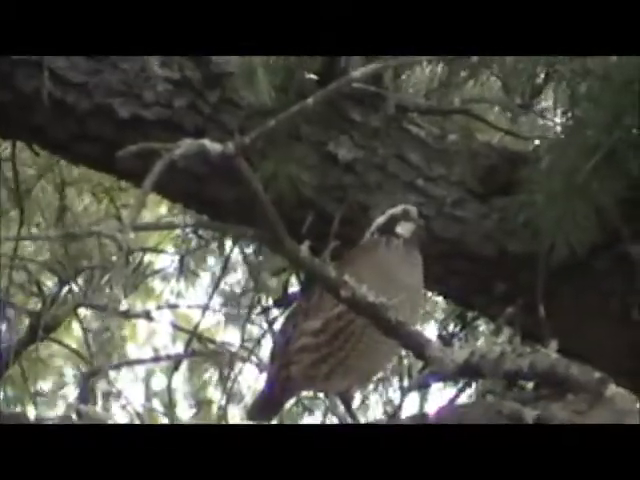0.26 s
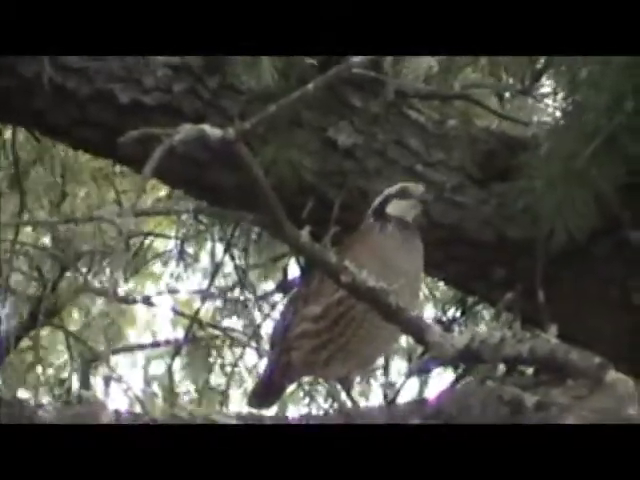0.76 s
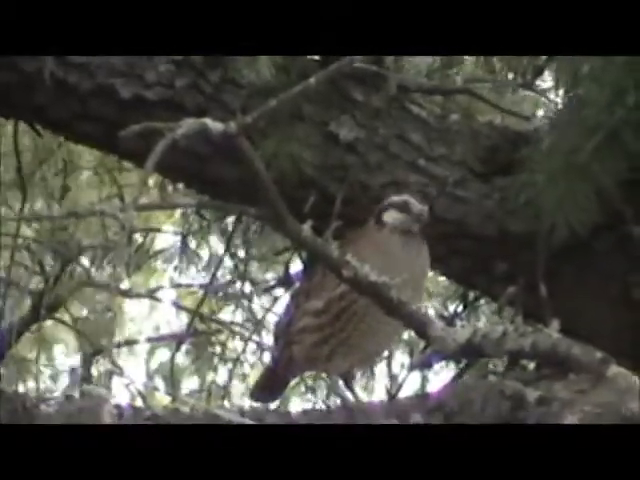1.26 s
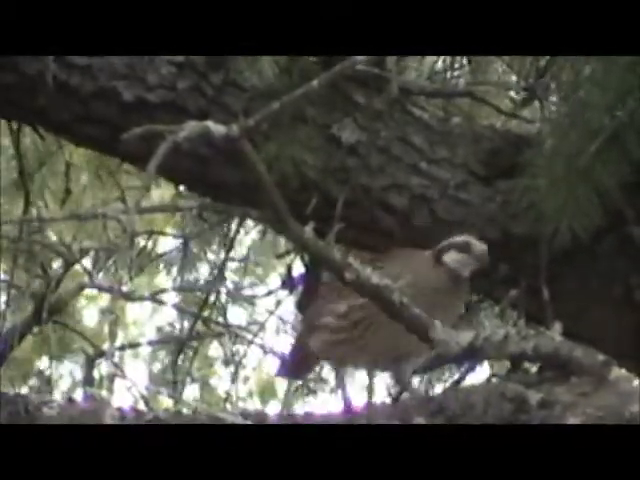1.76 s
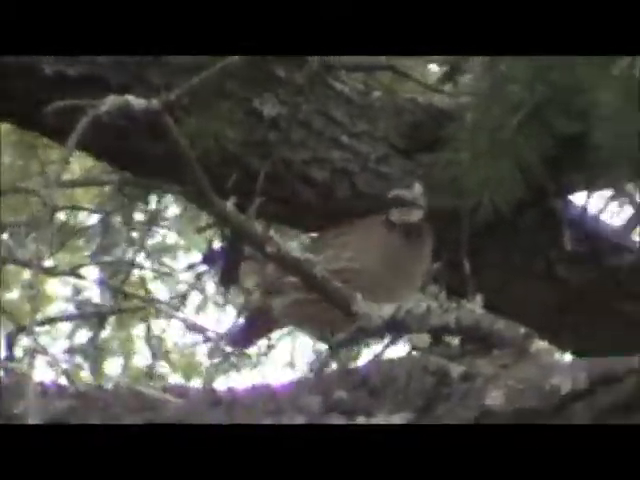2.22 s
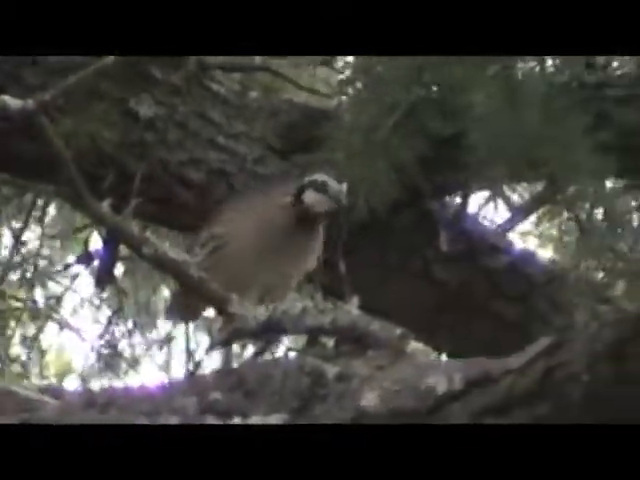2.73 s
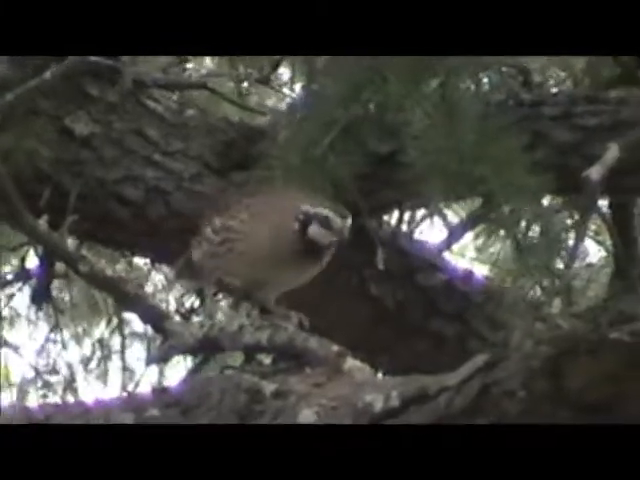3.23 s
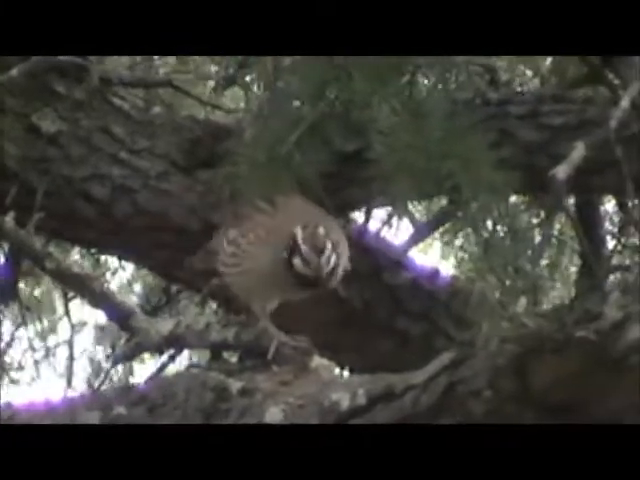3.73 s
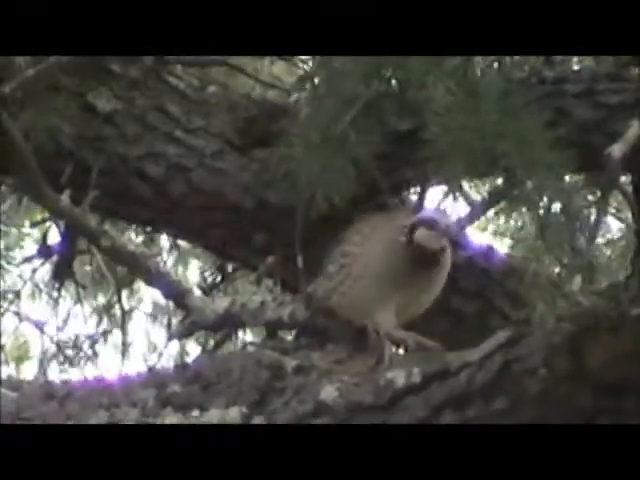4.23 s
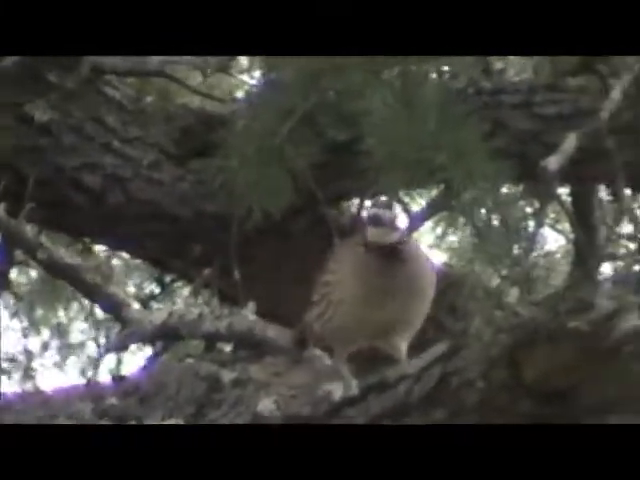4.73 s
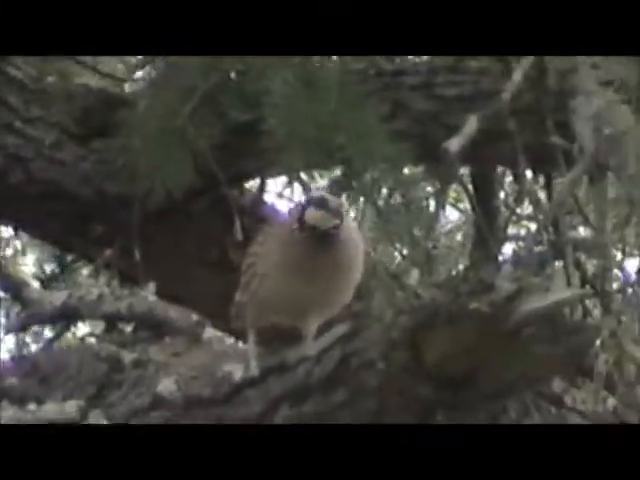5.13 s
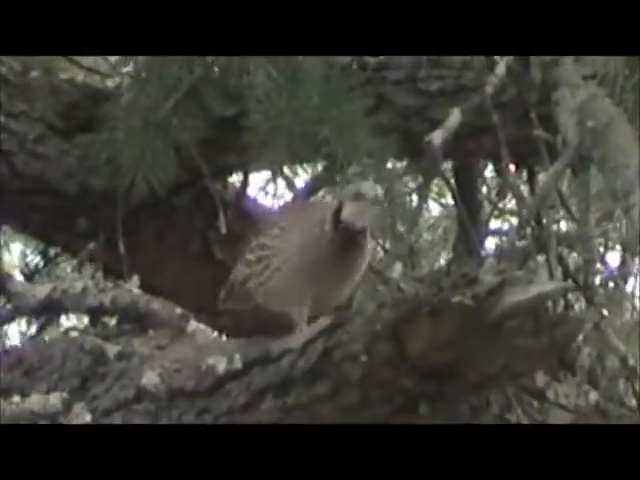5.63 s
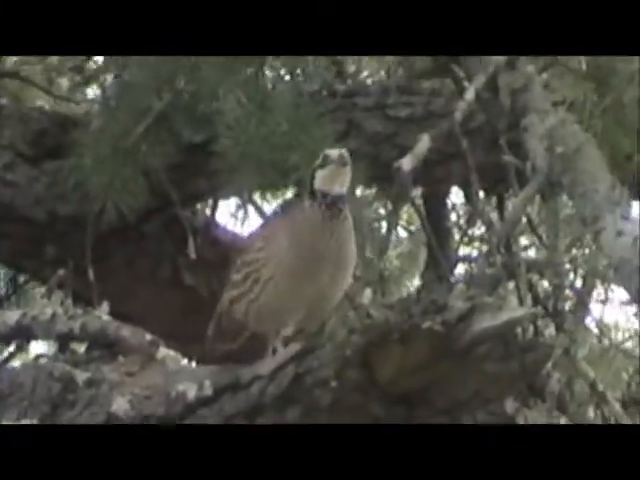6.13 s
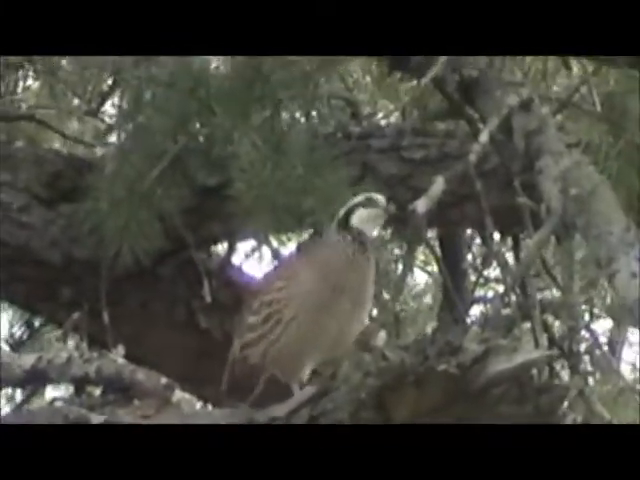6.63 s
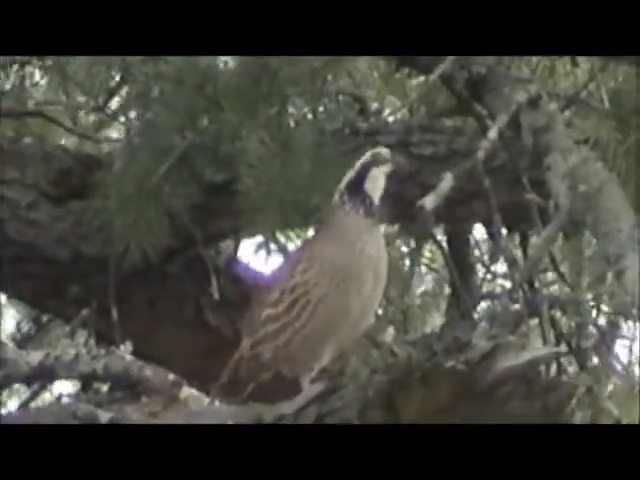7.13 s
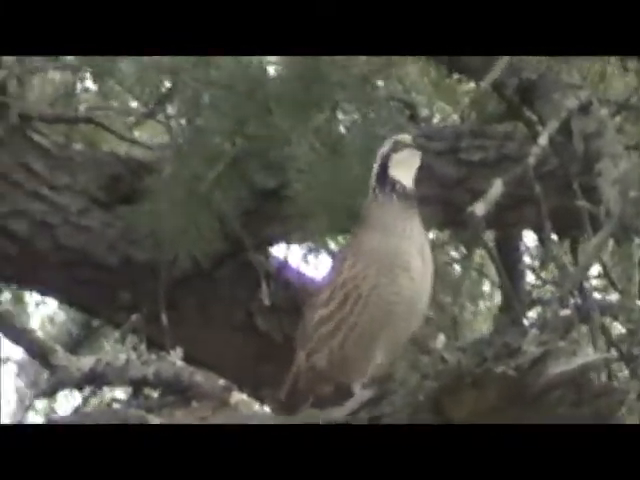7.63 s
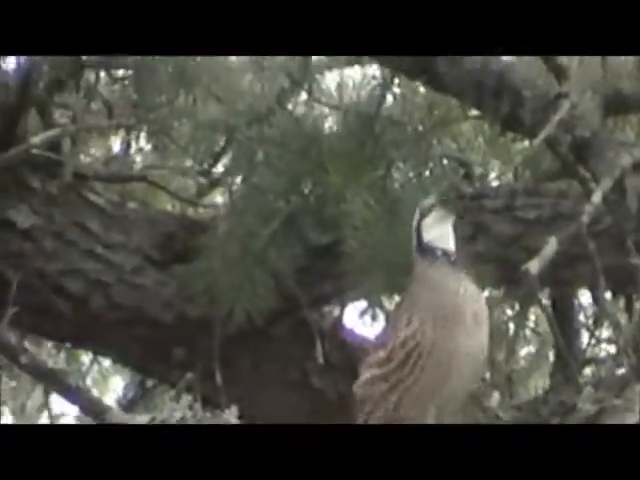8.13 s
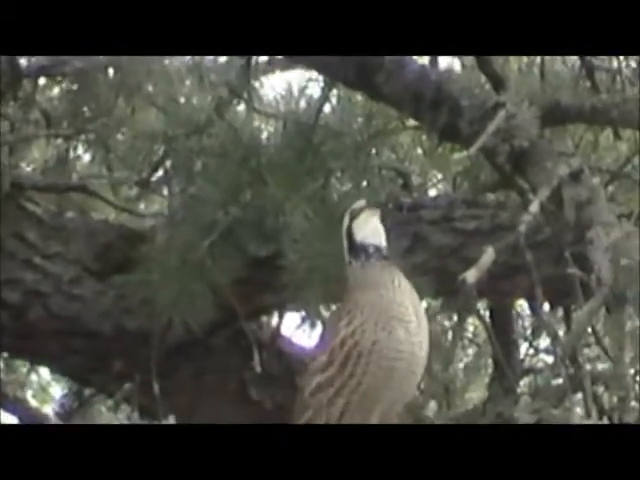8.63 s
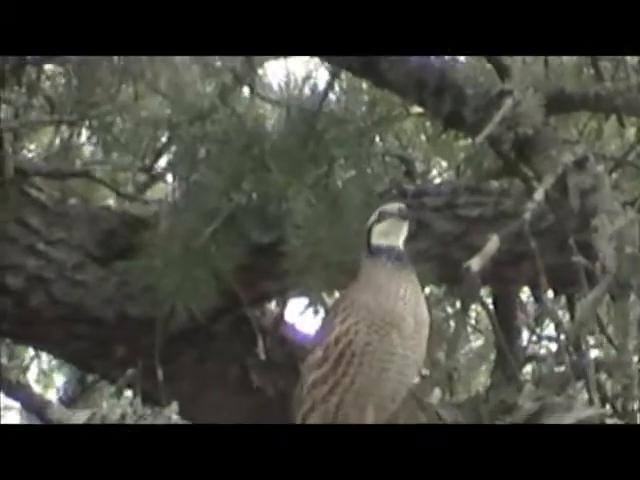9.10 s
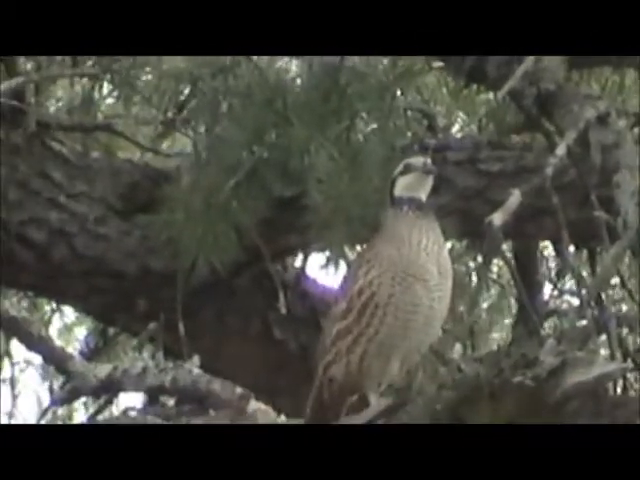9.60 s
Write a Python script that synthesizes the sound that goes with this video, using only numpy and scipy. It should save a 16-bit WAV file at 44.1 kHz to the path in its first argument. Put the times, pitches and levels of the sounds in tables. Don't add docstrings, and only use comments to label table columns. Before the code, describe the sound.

A wooded outdoor place with a continuous soft hiss and low rumble of far traffic, quietest at 0-1 s, swelling until about 5 s and then staying full. A heavy engine drones faintly, low at first, shifting higher around 4.2 s, strongest near 5.7 s, then settling and fading. Tiny chips, seeps and slurs are scattered throughout over a thin haze of distant birds. Clearer arched, very high pipes come from the right at about 3.1, 3.7, 5.4, 6.3, 7.4 and 9.35 s; a high sagging note at 5.2 s lies left. Faint twig rustles surface, mostly between 4 and 6.7 s, and needles hiss gently around 7.6 s. At 8.13 s a small low air puff bumps, mostly left. The quail whistles a level, clear note at 8.2 s, then at 8.85 s a louder note sweeping steeply upward, cracking at 9.0 s into a brief falling rasp. Light trunk echoes fade into traffic.

```python
import sys
import numpy as np
from scipy import signal
from scipy.fft import rfft, irfft
from scipy.io import wavfile
from scipy.ndimage import uniform_filter1d

SR = 44100
rng = np.random.default_rng(int(sys.argv[2]) if len(sys.argv) > 2 else 0)


def digitize_waveform(pressure):
    field = np.atleast_2d(pressure).T
    bounded = np.clip(field, -1, 1)
    quanta = np.round(bounded * 32767).astype(np.int16)
    wavfile.write(sys.argv[1], SR, quanta)


def volts_from_decibels(level):
    exponent = np.asarray(level, float) / 20
    return 10 ** exponent


N = 434826

# time in seconds, pitch in Hz, effort in dB.
WHISTLE_NOTES = [
    [(8.186, 1156, -34), (8.202, 1536, -31), (8.211, 1628, -18.5), (8.232, 1767, -16.5), (8.278, 1822, -18),
     (8.3, 1862, -15.5), (8.34, 1842, -17), (8.354, 1760, -30), (8.37, 1800, -34)],
    [(8.848, 896, -38), (8.87, 1338, -39), (8.885, 1643, -19.5), (8.9, 1785, -17.5), (8.956, 2023, -10.5),
     (8.975, 2213, -14.5), (8.992, 2535, -11), (9.001, 2660, -16)],
]
# multiple, level in dB.
WHISTLE_OVERTONES = [(1.25, -21.5), (1.75, -36), (2, -29), (3, -46), (3.5, -43), (3.75, -43), (4, -32.5),
                     (4.25, -41), (4.5, -46), (4.75, -42), (5, -39), (5.25, -48), (5.75, -49), (6, -51),
                     (6.5, -47), (6.75, -44), (7, -39)]
# frequency in Hz, gain in dB.
BRANCH_COMB = [(1650, 1.5), (1755, -9.5), (1830, 2.5), (1950, 2), (1985, -7), (2005, 3.5), (2080, -14),
               (2200, 4.5), (2290, 0), (2390, -13), (2470, -3), (2600, -0.5)]
# frequency in Hz, gain in dB.
BEAK_COLOUR = [(3000, -8.5), (7000, 8), (8500, -0.5), (10000, -2), (12500, -13), (14000, -19)]
# time in seconds, pulse rate in Hz, effort in dB.
RASP_CURVE = [(8.998, 1883, -25), (9.003, 1797, -21.5), (9.016, 1480, -23), (9.028, 1347, -21),
              (9.04, 1260, -30), (9.064, 1064, -28), (9.088, 884, -32), (9.1, 800, -46)]
# frequency in Hz, gain in dB.
THROAT_COLOUR = [(900, -32), (1600, -18), (2100, -8), (2550, -4.5), (3000, -7), (3250, -6), (3520, -2.5),
                 (3900, -15), (4300, -16.5), (4900, -14.5), (5600, -21), (7000, -28), (9000, -31),
                 (14000, -51)]

# start in seconds, length in seconds, top pitch in Hz, last pitch in Hz, level in dB.
PIPER_CALLS = [(1.495, 0.08, 7530, 6270, -56), (3.101, 0.15, 8090, 6600, -43),
               (3.692, 0.15, 8110, 6680, -42), (5.388, 0.11, 8120, 6440, -47),
               (5.87, 0.093, 7700, 7100, -49), (6.254, .118, 8020, 6500, -45),
               (7.371, 0.13, 8100, 7630, -45), (9.35, 0.11, 7900, 7600, -50.5)]
# start in seconds, first pitch in Hz, level in dB.
CHIP_CALLS = [(0.029, 4100, -51.5), (.92, 7600, -58), (2.67, 7400, -47), (2.72, 4050, -52),
              (3.409, 4800, -58), (3.741, 3500, -52), (4.26, 4450, -51), (7.175, 4100, -44.5)]
# start in seconds, length in seconds, first pitch in Hz, last pitch in Hz, level in dB.
SLUR_CALLS = [(0.068, .04, 6300, 6750, -60.5), (.69, .05, 6600, 7900, -66), (.78, .043, 7000, 8160, -67),
              (1.323, 0.074, 9600, 8050, -59), (1.69, 0.082, 10500, 5500, -52.5),
              (1.84, 0.056, 7700, 6840, -63), (2.06, .079, 7000, 6050, -59),
              (2.506, 0.12, 2970, 3140, -51.5), (3.347, 0.084, 4900, 6700, -57),
              (3.57, .04, 6250, 7500, -64), (8.57, 0.033, 7900, 8370, -53), (8.59, .026, 8400, 9800, -60.5)]
# start in seconds, length in seconds, pitch in Hz, level in dB.
SEEP_CALLS = [(.11, 0.16, 7300, -71), (.85, .1, 7410, -64), (1.1, .1, 7550, -70), (1.39, 0.071, 8240, -57),
              (2.02, .08, 7550, -71), (2.12, 0.39, 7700, -62), (2.127, .25, 7090, -61),
              (2.4, 0.44, 7500, -62), (2.46, 0.035, 2850, -50), (2.495, .1, 2780, -52),
              (2.777, 0.11, 5350, -51), (4.04, 0.045, 9130, -62), (4.547, .07, 7100, -57),
              (8.704, .05, 7830, -66)]
# start in seconds, length in seconds, first pitch in Hz, level in dB.
SAG_CALLS = [
    (2.426, 0.18, 8850, -51.5),
    (4.505, 0.11, 8600, -58.5),
    (5.194, 0.13, 8460, -45.5),
]
PIPER_LEAN_DB, CHIP_LEAN_DB, SLUR_LEAN_DB, SEEP_LEAN_DB, SAG_LEAN_DB = -3, -3, -5, -1, 7
CHIP_S, CHIP_DIP_SHARE, SAG_HZ_PER_S = 0.04, 0.09, 1200
CHORUS_DB, CHORUS_JOINS_S, CHORUS_SWELL_S, CHORUS_GROWS_DB_PER_S = -65.5, 0.69, 0.18, 0.63

# start in seconds, length in seconds, level in dB.
TWIG_RUSTLES = [(1.5, .13, -57), (2.68, .04, -61), (3.363, .13, -57), (3.974, .16, -56), (4.24, .18, -52.5),
                (5.46, .06, -60), (5.9, .08, -54), (6.29, .08, -52), (6.6, .1, -53), (7.751, 0.095, -58),
                (8.58, 0.046, -63), (9.756, .05, -67.5)]
# start in seconds, length in seconds, level in dB.
AIR_PUFFS = [
    (8.129, 0.028, -35),
    (8.14, .016, -26),
    (8.153, .03, -35.5),
    (8.177, 0.042, -43),
]

# frequency in Hz, density in dB per Hz.
WASH_COLOUR = [(18, -49), (30, -33.5), (130, 0), (369, -14.5), (575, -10.5), (690, -4.5), (1020, -5.5),
               (1260, -6), (1960, -9), (3670, -19.5), (6880, -23), (8930, -38), (12500, -46), (14300, -53),
               (15600, -64)]
# centre in Hz, width in Hz, height in dB.
HISS_HUMP_HZ_HZ_DB = (5020, 370, 2.8)
# time in seconds, level in dB.
TRAFFIC_SWELL = [(0, -52.5), (.35, -54), (1.5, -47), (2.2, -47), (2.8, -46), (3.1, -46), (3.85, -43),
                 (4.6, -43), (5.15, -40), (5.7, -41.5), (6.55, -42.5), (7.2, -42), (7.7, -41.5), (8.3, -41),
                 (8.8, -43.5), (9.86, -43)]
# centre in seconds, half length in seconds, rise in dB.
NEEDLE_GUSTS = [
    (1.55, 0.21, 1),
    (4.1, 0.16, 1),
    (5.2, 0.51, 0),
    (6.3, 0.86, 2),
    (7.63, 0.31, 3),
]
# frequency in Hz, correlation from 0 to 1.
PORT_LIKENESS = [(60, 0.64), (180, 1), (380, .76), (700, 0.93), (1650, 0.87), (5000, 1), (8000, 1),
                 (15000, 0.27)]
# frequency in Hz, left over right in dB.
PORT_LEAN = [(60, -6.5), (180, 6.5), (550, 0.5), (1650, -4), (4970, -0.5), (15000, -1.5)]
# frequency in Hz, phase in radians.
PORT_LEAD = [(60, 0.09), (500, -0.24), (2500, 0.18)]
FULL_S = 5.2
RUMBLE_SHARE, ROAR_SHARE, UPPER_SHARE, HISS_SHARE, FIZZ_SHARE = 0.38, 1.005, 1.33, 1, 1.1
LORRY_NEAREST_S, LORRY_PASS_S = 6.67, 3.4
GUST_REACH = 0.26
# time in seconds, firing rate in Hz, level in dB.
ENGINE_GEARS = [
    [(0, 84, -61), (1.5, 84.5, -53), (3.2, 82.8, -50.5), (4.0, 81.5, -62)],
    [(4.25, 131.5, -48), (4.6, 130.1, -49.5), (5.7, 126.5, -40.5), (6.4, 125.7, -43.5), (6.8, 122.5, -47)],
    [(7.15, 123.3, -51.5), (7.6, 123, -45), (8.4, 121.9, -50.5), (9.86, 124, -59.5)],
]

# frequency in Hz, t60 in seconds.
TREE_DECAY = [(500, 0.67), (2000, 0.51), (4000, 0.61), (8000, 0.3), (14000, 0.38)]
FAR_DB, FAR_STRETCH = -4, 2.6


def evened(x):
    return x / np.sqrt(np.mean(x ** 2) + 1e-20)


def read(points, hz):
    f, value = np.transpose(points)
    return np.interp(np.log(hz + 1), np.log(f + 1), value)


def add(mix, start_s, sound):
    part = mix[..., round(start_s * SR):][..., :sound.shape[-1]]
    part += sound[..., :part.shape[-1]]


def unfold(rows):
    s, *columns = np.transpose(rows)
    t = np.arange(s[0], s[-1], 1 / SR)
    return s[0], [uniform_filter1d(np.interp(t, s, c), size=130, mode="nearest") for c in columns]


def drift(count, size):
    return evened(uniform_filter1d(uniform_filter1d(rng.standard_normal(count), size), size))


def sine(hz):
    return np.sqrt(2) * np.sin(2 * np.pi * np.cumsum(hz) / SR)


def panned(x, lean_db):
    return np.array([x * volts_from_decibels(lean_db / 2), x * volts_from_decibels(-lean_db / 2)])


def quail_whistle(rows):
    start_s, (hz, effort_db) = unfold(rows)
    tone = volts_from_decibels(effort_db + read(BRANCH_COMB, hz)) * sine(hz)
    for k, db in WHISTLE_OVERTONES:
        effort_share = 0.6 if k % 1 == 0 else 1.3
        drive_db = effort_share * (effort_db + 13.5) - 15
        overtone_db = drive_db + db + read(BEAK_COLOUR, k * hz) + 3.2 * drift(len(hz), size=250)
        tone += volts_from_decibels(overtone_db) * sine(k * hz)
    return start_s, tone * signal.windows.tukey(len(hz), 0.08)


def quail_rasp():
    start_s, (hz, effort_db) = unfold(RASP_CURVE)
    count = len(hz)
    hz = hz * (1 + 0.0037 * drift(count, size=40))
    stack = np.zeros(count)
    for k in range(1, 14):
        gain = volts_from_decibels(read(THROAT_COLOUR, k * hz) + 2.5 * drift(count, size=150))
        stack += gain * sine(k * hz) * (k * hz < 15000)
    throat_gain = volts_from_decibels(read(THROAT_COLOUR, np.fft.rfftfreq(count, 1 / SR)))
    air = irfft(rfft(rng.standard_normal(count)) * throat_gain, count)
    air = volts_from_decibels(-2.0 - 90 * np.arange(count) / SR) * evened(air)
    return start_s, volts_from_decibels(effort_db) * (stack + air) * signal.windows.tukey(count, 0.08)


def quail():
    out = np.zeros(N)
    for rows in WHISTLE_NOTES:
        add(out, *quail_whistle(rows))
    add(out, *quail_rasp())
    return panned(out, -3.5)


def piper():
    out = np.zeros((2, N))
    for start_s, length_s, top_hz, last_hz, db in PIPER_CALLS:
        u = np.linspace(0, 1, round(length_s * SR))
        hz = top_hz * (1 - 0.036 * (1 - u) ** 5.25) - (top_hz - last_hz) * u ** 5.0
        tone = sine(hz) + volts_from_decibels(-25) * u ** 3.0 * sine(2 * hz)
        tone *= volts_from_decibels(db + 4.2 * u + 3.2 * drift(len(u), size=120))
        left, right = panned(tone * signal.windows.tukey(len(u), 0.3), PIPER_LEAN_DB)
        add(out, start_s, np.array([np.roll(left, 1), right]))
    return out


def chirp(start_s, length_s, first_hz, last_hz, db, lean_db, flutter_db=4.0):
    u = np.linspace(0, 1, round(length_s * SR))
    hz = last_hz + (first_hz - last_hz) * (1 - u) ** 2.6
    hz = hz * (1 + 0.008 * drift(len(u), size=100))
    level = volts_from_decibels(db + 4.4 * (u - 1.0) + flutter_db * drift(len(u), size=120))
    return start_s, panned(level * sine(hz) * signal.windows.tukey(len(u), 0.6), lean_db)


def small_birds():
    out = np.zeros((2, N))
    for start_s, hz, db in CHIP_CALLS:
        last_hz = hz * (1 - CHIP_DIP_SHARE)
        add(out, *chirp(start_s, CHIP_S, hz, last_hz, db, CHIP_LEAN_DB, flutter_db=5.5))
    for row in SLUR_CALLS:
        add(out, *chirp(*row, SLUR_LEAN_DB))
    for start_s, length_s, hz, db in SEEP_CALLS:
        add(out, *chirp(start_s, length_s, hz, hz, db, SEEP_LEAN_DB))
    for start_s, length_s, hz, db in SAG_CALLS:
        add(out, *chirp(start_s, length_s, hz, hz - SAG_HZ_PER_S * length_s, db, SAG_LEAN_DB))
    return out


def rustles():
    out = np.zeros((2, N))
    bright = signal.butter(2, [3500, 8500], "bandpass", fs=SR, output="sos")
    for start_s, length_s, db in TWIG_RUSTLES:
        count = round(length_s * SR)
        snaps = rng.standard_normal((3, count)) * volts_from_decibels(3.1 * rng.exponential(1, count))
        ports = snaps[0] + 0.68 * snaps[1:]
        add(out, start_s, volts_from_decibels(db) * evened(signal.sosfilt(bright, ports)) * np.hanning(count) ** 0.42)
    return out


def puffs():
    out = np.zeros((2, N))
    low = signal.butter(2, [70, 520], "bandpass", fs=SR, output="sos")
    for start_s, length_s, db in AIR_PUFFS:
        lump = signal.sosfilt(low, rng.standard_normal((2, 4000)))[:, -round(length_s * SR):]
        port_db = db + np.array([[2.5], [-2.5]])
        add(out, start_s, volts_from_decibels(port_db) * evened(lump) * np.hanning(lump.shape[1]))
    return out


def swell(t):
    s, db = np.transpose(TRAFFIC_SWELL)
    return np.interp(t, s, db) - np.interp(FULL_S, s, db)


def road():
    frames, hz = N // 256 + 5, np.fft.rfftfreq(1024, 1 / SR)
    a, b, c, d, patches = rng.standard_normal((frames, 513, 5)).T
    patches = evened(uniform_filter1d(uniform_filter1d(patches, size=8, axis=0), size=50, axis=1))
    t = np.arange(frames) * 256 / SR
    layers_db = np.outer([RUMBLE_SHARE, ROAR_SHARE, UPPER_SHARE, HISS_SHARE, FIZZ_SHARE], swell(t))
    layers_db[0] -= 10 * np.log10(1 + ((t - LORRY_NEAREST_S) / LORRY_PASS_S) ** 2)
    gust_db = sum(db * np.exp(-((t - s) / half_s) ** 2) for s, half_s, db in NEEDLE_GUSTS)
    layers_db[2:] += np.outer([1, GUST_REACH, GUST_REACH], gust_db)
    centres = np.log([200, 900, 2300, 5000, 10000])
    shares = np.array([np.interp(np.log(hz + 1), centres, row) for row in np.eye(5)])
    hump_hz, hump_width_hz, hump_db = HISS_HUMP_HZ_HZ_DB
    colour_db = read(WASH_COLOUR, hz) + hump_db * np.exp(-((hz - hump_hz) / hump_width_hz) ** 2)

    same = np.clip(read(PORT_LIKENESS, hz), -1, 1)[:, None]
    left = a + 1j * b
    right = same * left + np.sqrt(1 - same ** 2) * (c + 1j * d)
    right = right * np.exp(-1j * read(PORT_LEAD, hz))[:, None]
    lean = volts_from_decibels(read(PORT_LEAN, hz) / 2)[:, None]
    level = volts_from_decibels(colour_db[:, None] + shares.T @ layers_db + 1.06 * patches)
    z = np.array([left * lean, right / lean]) * level
    wash = signal.istft(z, nperseg=1024, noverlap=768)[1][:, :N]
    return volts_from_decibels(-34.0) * wash / np.std(wash[:, 5 * SR:7 * SR])


def engine():
    out = np.zeros(N)
    for rows in ENGINE_GEARS:
        start_s, (hz, db) = unfold(rows)
        hz = hz * (1 + 0.0136 * drift(len(hz), size=4000))
        tone = sine(hz) * volts_from_decibels(2.2 * drift(len(hz), size=3000))
        tone += volts_from_decibels(-10.5 + 2.7 * drift(len(hz), size=5000)) * sine(2 * hz)
        add(out, start_s, volts_from_decibels(db) * tone * signal.windows.tukey(len(hz), 0.1))
    return panned(out, 4.3)


def chorus():
    out = np.zeros((2, N))
    for when, length, pitch, glide, size, lean in rng.random((450, 6)):
        u = np.linspace(0, 1, round((0.03 + 0.09 * length) * SR))
        hz = 7750 - 1300 * pitch ** 1.6 + 500 * (glide - 0.7) * u
        hz = hz * (1 + 0.012 * drift(len(u), size=90))
        pipe = sine(hz) * np.hanning(len(u)) * volts_from_decibels(6 * size)
        add(out, when * N / SR, panned(pipe, 16 * (lean - 0.5)))
    t = np.arange(N) / SR
    joined = 0.5 + 0.5 * np.tanh((t - CHORUS_JOINS_S) / CHORUS_SWELL_S)
    return evened(out) * joined * volts_from_decibels(CHORUS_DB + CHORUS_GROWS_DB_PER_S * t)


def trees(x, wet_db, alike):
    taps = np.zeros((2, SR))
    at = np.arange(500, SR - 20, 20) + rng.integers(0, 20, (2, (SR - 501) // 20))
    np.put_along_axis(taps, at, rng.choice([-1., 1.], at.shape), 1)
    taps[1] += alike * taps[0]
    hz, t, z = signal.stft(taps, SR, nperseg=256)
    fall_db = -60 * t / read(TREE_DECAY, hz)[:, None]
    fall = volts_from_decibels(fall_db) + volts_from_decibels(FAR_DB + fall_db / FAR_STRETCH)
    tail = signal.istft(z * fall, SR, nperseg=256)[1]
    tail /= np.linalg.norm(tail, axis=1)[:, None]
    return x + volts_from_decibels(wet_db) * signal.fftconvolve(x, tail, axes=1)[:, :N]


def scene():
    birds = trees(quail(), wet_db=-13.5, alike=2.2)
    birds = birds + trees(piper() + small_birds(), wet_db=-4.0, alike=0.37)
    haze = trees(chorus(), wet_db=2.0, alike=1.0)
    return birds + rustles() + puffs() + road() + engine() + haze


def roll_off(x):
    return signal.sosfilt(signal.butter(12, 15610, fs=SR, output="sos"), x)


def record(dry):
    x = signal.sosfilt(signal.butter(2, 42, "highpass", fs=SR, output="sos"), dry)
    hz, t, z = signal.stft(x, SR, nperseg=1024)
    power = uniform_filter1d((abs(z) ** 2).mean(0), size=9, axis=0)
    ragged = uniform_filter1d(rng.standard_normal(power.shape), size=14, axis=0)
    ragged = evened(uniform_filter1d(ragged, size=2, axis=1))
    whistle = power[(hz > 7000) & (hz < 9000)].max(0)
    threshold = whistle * volts_from_decibels(2 * (-34.5 + 2.5 * ragged))
    hidden = (uniform_filter1d(power, size=3, axis=1) < threshold) & (hz[:, None] > 8500)
    hidden &= abs(hz[:, None] - 11200 + 250 * ragged) > 500
    mix = signal.istft(z * ~hidden, SR, nperseg=1024)[1][:, :N]
    return roll_off(mix)


dry = scene()
out = record(dry)
digitize_waveform(out)
```